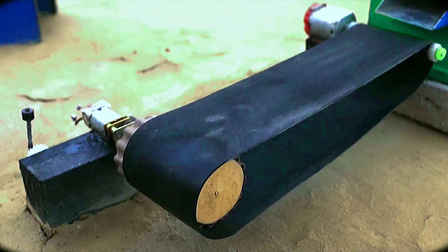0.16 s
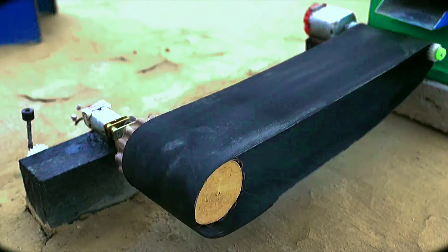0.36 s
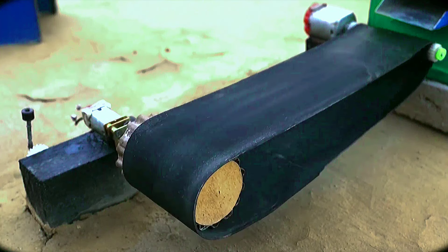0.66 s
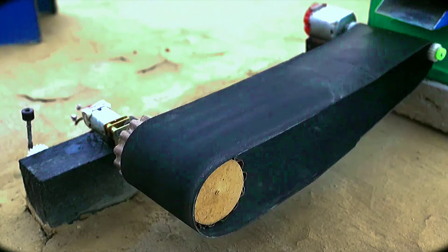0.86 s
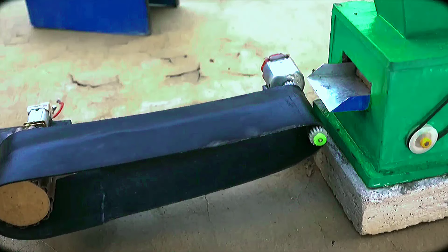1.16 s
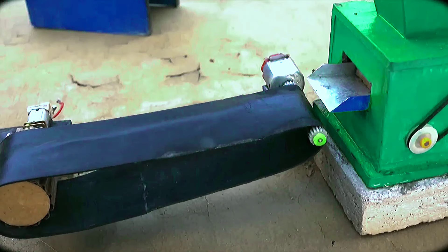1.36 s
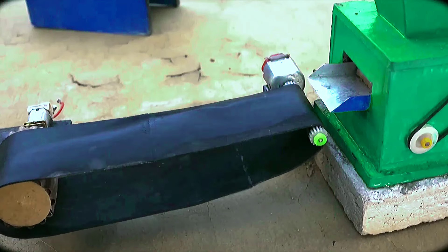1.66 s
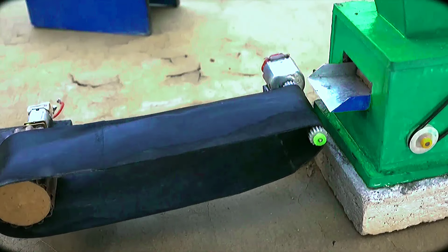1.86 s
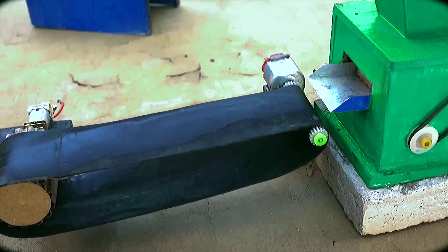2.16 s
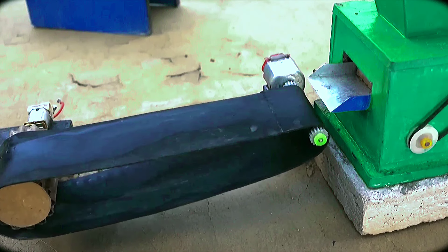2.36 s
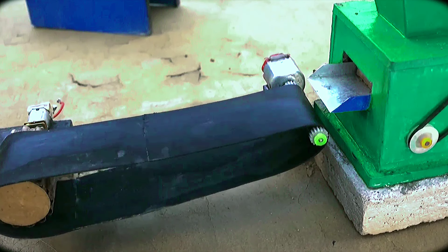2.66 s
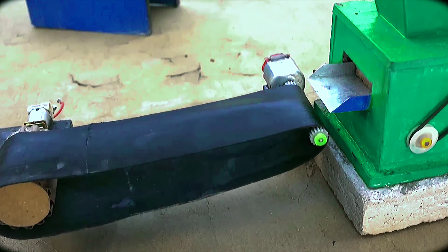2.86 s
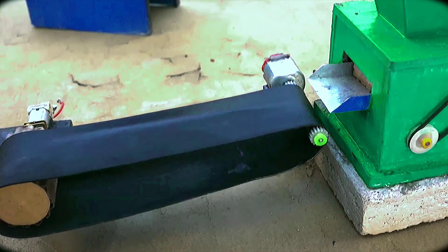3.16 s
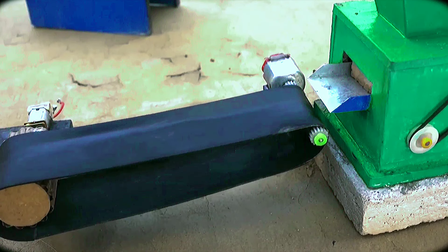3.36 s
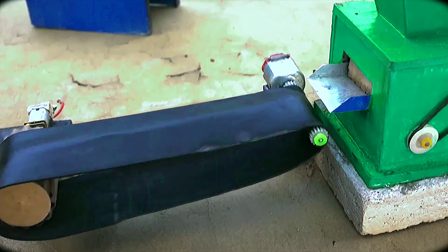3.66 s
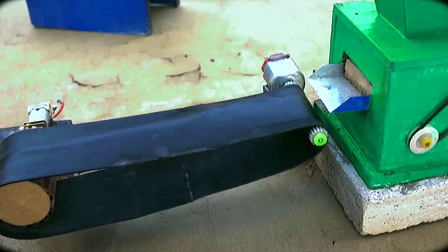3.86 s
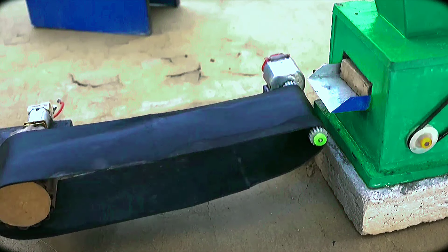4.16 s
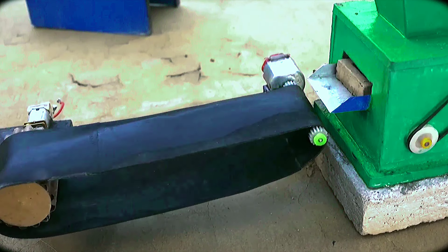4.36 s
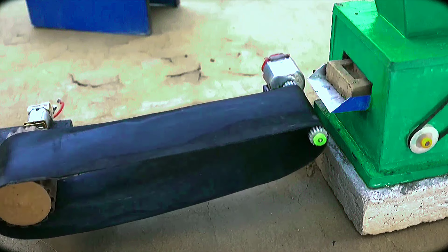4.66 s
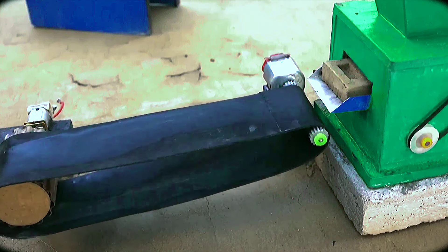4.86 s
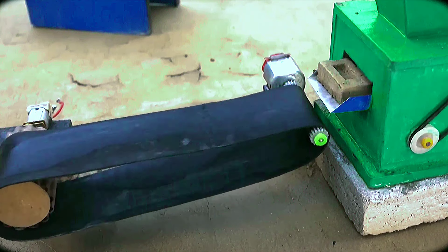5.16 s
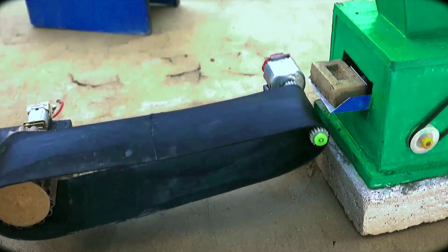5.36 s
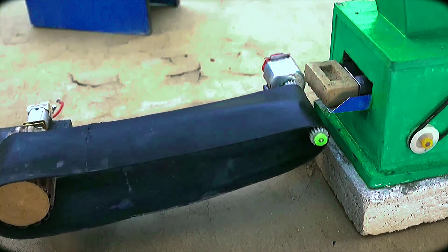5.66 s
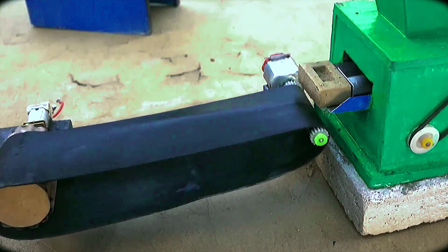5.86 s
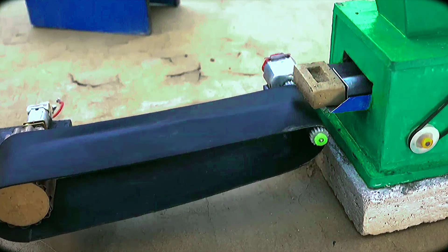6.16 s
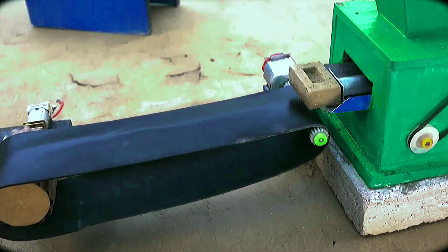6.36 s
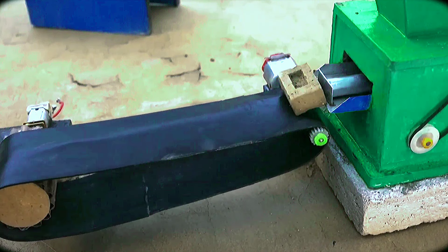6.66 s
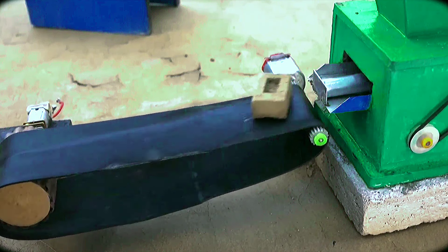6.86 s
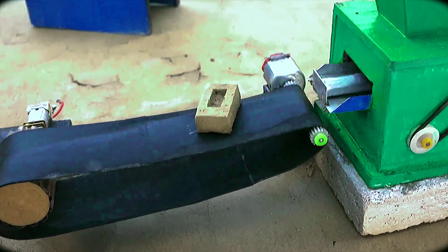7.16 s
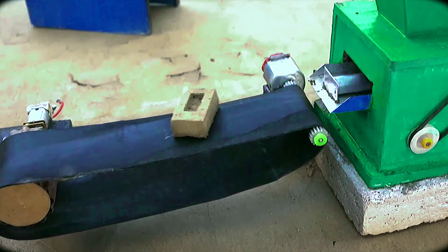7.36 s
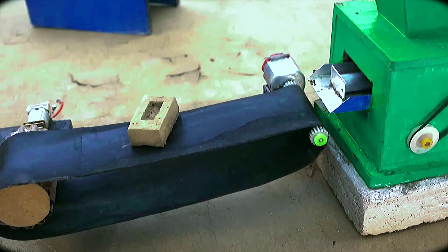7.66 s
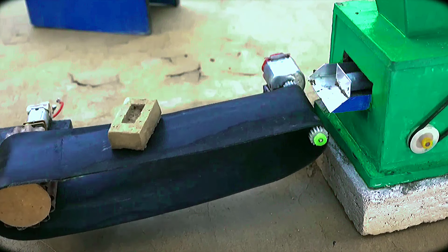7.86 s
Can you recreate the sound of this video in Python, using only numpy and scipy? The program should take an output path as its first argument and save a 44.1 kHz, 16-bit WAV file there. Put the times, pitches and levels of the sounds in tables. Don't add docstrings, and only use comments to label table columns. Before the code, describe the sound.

A miniature conveyor runs outdoors: piercing high motor whine, wavering gear tone, fine brush hiss, quick dry squeaks, and a faint distant engine drone.

```python
import sys
import numpy as np
from scipy import signal
from scipy.io import wavfile
from scipy.ndimage import uniform_filter1d

SR = 44100
rng = np.random.default_rng(int(sys.argv[2]) if len(sys.argv) > 2 else 0)


def invert_db(x):
    u = np.asarray(x, float) / 20
    return 10 ** u


def to_wav(sig):
    pcm = np.clip(np.atleast_2d(sig), -1, 1) * 32767
    pcm = np.round(pcm).astype(np.int16)
    wavfile.write(sys.argv[1], SR, pcm.T)


N = 352844

# t/s, third order f/Hz, its level/dB, first order level/dB, dip depth a gear turn [0-1]
STEADY_MESH = [(0.0, 4655, -33.5, -31, .5), (0.45, 4696, -30.5, -32.5, .6), (1.128, 4680, -33, -32, .55),
               (1.143, 4600, -36, -30.5, .6), (1.6, 4592, -31, -34.5, 0.09), (2.1, 4610, -32.5, -38, .2),
               (2.8, 4610, -32, -43, .3), (2.92, 4605, -33, -28, 0), (3.6, 4578, -30, -28, 0.21),
               (4.1, 4585, -31.5, -24.5, 0), (4.7, 4578, -30, -24, 0), (5.45, 4608, -33.5, -23.5, 0.29),
               (5.75, 4572, -33, -28, 0.41), (6.0, 4608, -31, -24.5, .75), (6.45, 4548, -31, -31.5, .75),
               (6.8, 4580, -27, -26.5, .7), (7.5, 4565, -29, -26, .95), (8.0, 4605, -30.5, -25.5, .88)]
# order number, level/dB
STEADY_ORDERS = [
    [(2, -38.5), (4, -32), (6, -40.5), (8, -56), (9, -54)],
    [(2, -37), (4, -41), (6, -41), (7, -51), (8, -55), (9, -49)],
]
GEAR_LEAD = [.17, 0.14]
# t/s, lead [turns], length [s]
GEAR_SLIP = [
    (6.65, .17, .3),
]
# t/s, level/dB, length [s]
THIRD_DIPS = [
    (1.39, -4, 0.039),
    (2.9, -3, 0.093),
    (5.6, -1, .03),
    (5.9, -13, .045),
    (6.112, -20, 0.029),
    (7.965, -14, 0.037),
]
# t/s, level/dB, length [s]
FIRST_DIPS = [(2.12, -8, 0.029), (2.37, -5, .03), (2.67, -9, 0.037), (3.611, -8, .04), (4.39, -9, .012),
              (4.57, -7, .012), (4.72, -8, .012), (5.2, -8, .015), (5.73, -7, .03), (7.04, -8, .025),
              (7.4, -8, .025)]
FIFTH_DB = [-40.5, -40.5]
# t/s, level/dB, length [s]
FIFTH_SWELLS = [
    (3.3, -5, .35),
    (3.85, 3, .15),
    (5.4, 5, .3),
    (6.1, -6, .3),
    (6.68, 5.5, .1),
    (7.8, -5, .4),
]


def steady_motor():
    third_hz, third_db, first_db, depth = curves(STEADY_MESH)
    mesh_beats_a_turn, swing_hz, swing_lead = 281.5, 14, 0.322
    turns = np.cumsum(third_hz / 3) / SR / mesh_beats_a_turn
    gear = 2 * np.pi * (turns + by_position(GEAR_LEAD) + bumps(GEAR_SLIP))
    third_hz = third_hz + swing_hz * np.cos(gear + 2 * np.pi * swing_lead) + 9 * wander(5.09)
    third_db = third_db + bumps(THIRD_DIPS) + 1.08 * wander(7.3)
    first_db = first_db + bumps(FIRST_DIPS)
    depth = np.clip(depth, 0, .97)
    first = invert_db(first_db + 3.0) * abs(1 + depth * np.exp(1j * gear)) ** .85
    phase = 2 * np.pi * np.cumsum(third_hz / 3 + 3.82 * wander(46.7)) / SR
    out = invert_db(third_db + 1.16 * wander(22) + 7.0) * np.cos(3 * phase)
    slip = (.2 + .012 / (first + .004)) * wander(30)
    flutter_db = (.8 + .012 / (first + .006)) * wander(30)
    out += first * invert_db(flutter_db) * np.cos(phase + slip)
    fifth_db = by_position(FIFTH_DB) - 3.5 * depth * np.cos(gear + .1) + bumps(FIFTH_SWELLS)
    out += invert_db(fifth_db + 4.0 + 2.3 * wander(32)) * np.cos(5 * phase)
    for orders, heard in zip(STEADY_ORDERS, (~second_position(), second_position())):
        for order, db in orders:
            level = invert_db(db + 2.0 * wander(5.6) + 1.6 * wander(50))
            out += heard * level * np.cos(order * phase + .3 * wander(40))
    return out


# t/s, f/Hz, tooth pressure level/dB
LOADED_MESH = [(0.0, 1772, 0), (.27, 1766, 0), (.5, 1886, 0.5), (1.128, 1916, 0), (1.143, 1835, -0.5),
               (1.75, 1838, -4), (1.85, 1868, -1), (2.8, 1878, 2), (3.1, 1857, 1), (4.1, 1845, 0.5),
               (4.4, 1920, 1), (4.56, 1862, -0.5), (5.16, 1842, -1), (5.27, 1918, 0), (6.29, 1900, 0.5),
               (6.37, 1848, -2), (7.6, 1874, 0), (8.0, 1871, 0)]
# t/s, shift f/Hz, length [s]
SNAGS = [(1.15, -30, 0.031), (1.41, -42, 0.099), (2.09, -14, 0.067), (2.75, 14, 0.041),
         (3.014, -69.5, 0.049), (3.258, -52.5, .06), (3.6, -20, 0.051), (4.775, 35.5, .04),
         (5.0, -30, 0.098), (5.56, -22, .06), (5.99, -35.5, .14), (6.28, 14, 0.038), (6.59, -88, .13),
         (6.78, 10, .04), (6.92, -48, 0.071)]
# f/Hz, level/dB
MOUNT = [
    [(1765, -20.5), (1820, -25.5), (1890, -21.5), (1915, -21.5)],
    [(1775, -20), (1800, -25.5), (1825, -27.5), (1850, -24), (1878, -19.5), (1915, -18)],
]
WHEEL_LEAD = [-.17, -.04]
WHEEL_DEPTH = [.4, .27]
# f/Hz, level/dB
CASING = [(3500, -44.5), (3650, -39.5), (3850, -46.5), (5300, -56), (5600, -37.5), (5750, -31.5),
          (7400, -54), (9300, -48), (9700, -52), (10600, -44), (11100, -40.5), (11400, -52), (13000, -55)]
# f/Hz, width [Hz], level/dB
RATTLE_MODES = [
    [(936, 13, -52), (2640, 46, -54), (3200, 370, -40.5), (5540, 710, -33.5), (7060, 500, -43)],
    [(982, 78, -56), (2542, 58, -46), (3420, 150, -41), (5550, 170, -37), (6980, 1030, -40.5)],
]
# t/s, level/dB
LOOSENESS = [(1.15, -35), (2.66, -32.5), (2.94, -38), (4.03, -33), (4.31, -37), (6.28, -39), (6.36, -39),
             (6.51, -36.5), (8.0, -39.5)]


def loaded_motor():
    hz, pressure_db = curves(LOADED_MESH)
    hz = hz + bumps(SNAGS)
    level_db = pressure_db + by_position([np.interp(hz, *np.transpose(mount)) for mount in MOUNT])
    depth = by_position(WHEEL_DEPTH) * invert_db(2.2 * wander(2.1))
    mesh_beats_a_turn = 134.14
    wheel = 2 * np.pi * (np.cumsum(hz) / SR / mesh_beats_a_turn + by_position(WHEEL_LEAD))
    slack = np.clip((-19.0 - level_db) / 7, .1, 1)
    throb = 1 + 1.1 * depth * np.cos(wheel) + (.18 + .1 * slack) * np.cos(2 * wheel - .55)
    phase = 2 * np.pi * np.cumsum(hz - 2.9 * np.sin(wheel) + 5.44 * wander(30.5)) / SR
    chatter_hz = (9.7 + 14 * slack) * np.sin(2 * wheel + 2.02) + 10 * slack * wander(36.3)
    chatter = 2 * np.pi * np.cumsum(chatter_hz) / SR
    out = invert_db(level_db + 2.5 + (0.25 + 2.0 * slack) * wander(57)) * np.cos(phase + chatter)
    ragged_skirt = evened(resonate(rng.standard_normal(N), hz, 120))
    out += invert_db(level_db - 4.5) * slack * ragged_skirt
    out *= np.sqrt(abs(throb))
    for order in range(2, 8):
        radiated_db = np.interp(order * hz, *np.transpose(CASING))
        blur = .17 * order * wander(70)
        out += invert_db(radiated_db + 3.5 * wander(23)) * np.cos(order * phase + blur)
    knocks = rng.standard_normal(N) * invert_db(1.0 * wander(106))
    second_order_db = np.interp(2 * hz, *np.transpose(CASING)) + 3
    out += invert_db(second_order_db) * evened(resonate(knocks, 2 * hz - 50, 170))
    loose = invert_db(curves(LOOSENESS)[0] + 36.5)
    for modes, heard in zip(RATTLE_MODES, (~second_position(), second_position() * loose)):
        for mode_hz, width, db in modes:
            out += heard * invert_db(db) * evened(resonate(knocks, mode_hz, width))
    return np.sqrt(abs(throb)) * out


# t/s, turns done, level/dB
ROLLER_RUBS = [(0.141, 0, -26.5), (.568, 2, -32.5), (.981, 4, -26.5), (1.288, 5, -31.5), (1.838, 8, -32),
               (2.628, 12, -29.5), (3.506, 17, -32), (3.874, 19, -28.5), (4.531, 23, -32.5),
               (5.353, 28, -32.5), (6.087, 32, -36), (6.245, 33, -32), (6.9, 37, -34.5), (7.232, 39, -35),
               (7.404, 39.5, -46), (7.573, 41.5, -37), (7.912, 42.5, -42)]
# t/s of the top, level/dB, top f/Hz
SQUEAKS = [(1.292, -31, 7600.0), (1.464, -42, 7300.0), (1.656, -34, 6710), (1.841, -31, 7400),
           (2.44, -36, 8000), (2.625, -33, 7900.0), (2.815, -37, 8000), (2.991, -34, 7800),
           (3.173, -31.8, 8800.0), (3.346, -31.5, 8670), (3.515, -33, 7300.0), (3.701, -39.1, 6850.0),
           (3.871, -32, 8700), (4.046, -38.1, 7300.0), (4.207, -25, 6710), (4.385, -36, 6530),
           (5.041, -35.5, 7244), (5.197, -37.9, 7154), (5.366, -36.6, 7640), (5.718, -36, 8650.0),
           (5.903, -37.7, 7500), (6.087, -33, 9050), (6.241, -32, 8400), (6.407, -23.5, 6380),
           (6.579, -27, 7160), (6.74, -31, 7200), (6.915, -37.4, 6960), (7.072, -37, 6600),
           (7.235, -27, 6400.0)]
# f/Hz, level/dB
RUB_TONE = [
    [(4000, -20), (6000, -15), (8500, 3), (10500, 4), (11800, 3), (12500, -8), (15500, -4.5)],
    [(4000, -34), (6000, -2), (9500, 6.5), (10400, 3), (12100, 1.5), (12900, 9), (13700, 1), (15500, -1)],
]
SHAFT_HZ = 86.1


def roller():
    press, squeaks = np.zeros(N), np.zeros(N)
    half = SR // 12
    u = np.arange(-half, half) / SR
    at, done, rub_db = np.transpose(ROLLER_RUBS)
    turn = np.arange(44)
    times = np.interp(turn, done, at)
    levels = np.interp(turn, done, rub_db) + 1.1 * rng.standard_normal(len(turn))
    for s, db in zip(times, levels):
        length = .055 if s < SHOTS[0][1] else .036
        add(press, s - half / SR, invert_db(db + 1.1) * np.exp(-abs(u / length) ** 4.2))
    for s, db, top_hz in SQUEAKS:
        for turns, lower_hz, less_db in ((0, 0, 0), (-1, 700, -4), (1, 1000, -6)):
            hz = top_hz - lower_hz - 130e3 * abs(u - turns / SHAFT_HZ)
            fade = np.clip((hz - 5600) / 900, 0, 1)
            slip = evened(resonate(rng.standard_normal(len(u)), hz, 300))
            add(squeaks, s - half / SR, invert_db(db + less_db) * fade * slip)
    grains = coloured(RUB_TONE, patchy_db=2.6) * invert_db(1.2 * wander(300)) * shaft_beat(.45)
    return press * grains + squeaks


# f/Hz, level/dB
HISS_TONE = [
    [(24, -74), (40, -45), (247, -11), (1280, -20.5), (1570, -10.5), (1690, -15), (1920, -7), (2460, -18),
     (4260, -15), (4700, -7.5), (5070, -14), (5600, -9), (8350, -18.5), (11300, -19), (15600, -24)],
    [(30, -48), (75, -36), (140, -18.5), (390, -9.5), (620, -18), (1300, -21), (1700, -15), (2050, -13),
     (2780, -17.5), (3300, -12.5), (4120, -15.5), (4600, -11), (6200, -17), (10000, -21.5), (15600, -27)],
]
HISS_DB = [-36, -37]


def hiss():
    level = np.where(second_position(), invert_db(HISS_DB[1] + 9), invert_db(HISS_DB[0] + 10))
    return level * coloured(HISS_TONE, patchy_db=2.2) * shaft_beat(.18)


def shaft_beat(depth):
    turn = 2 * np.pi * np.cumsum(SHAFT_HZ + 1.41 * wander(2.7)) / SR
    return 1 + depth * np.cos(turn) + 0.31 * depth * np.cos(2 * turn)


# start t/s, end t/s, f/Hz, width [Hz], level/dB
SCRAPES = [
    (1.907, 2.073, 1340, 760, -32.5),
    (1.9, 2.08, 2370, 490, -32.5),
    (4.961, 5.06, 1030, 88.3, -42),
    (5.091, 5.255, 960, 170, -39.5),
    (5.32, 5.42, 894, 197, -44),
]


def scrapes():
    out = np.zeros(N)
    for start, end, hz, width, db in SCRAPES:
        grit = rng.standard_normal(SR // 4)[:round((end - start) * SR)]
        window = signal.windows.tukey(len(grit), .4)
        add(out, start, invert_db(db) * window * evened(resonate(grit, hz, width)))
    return out


# t/s, hum level/dB, hum f/Hz, rumble level/dB
DRONE = [(0.0, -46, 390, -50), (1.125, -50, 356, -48), (1.15, -33.5, 384.5, -42), (1.98, -31.5, 399, -40),
         (2.03, -37.5, 392, -45), (2.56, -27.5, 357.7, -38), (3.21, -26.5, 373, -44),
         (3.54, -29.5, 363, -44), (3.79, -28, 353.3, -58), (3.9, -26.5, 365.5, -39),
         (4.41, -43, 410.9, -51.5), (6.82, -37.5, 378, -53.5), (7.98, -49, 370, -47), (8.0, -50, 360, -64)]


def drone():
    hum_db, hum_hz, rumble_db = curves(DRONE)
    hum = evened(resonate(rng.standard_normal(N), hum_hz, 76))
    rumble = evened(resonate(resonate(rng.standard_normal(N), 221, 163), 224, 180))
    return invert_db(hum_db - 3.5) * hum + invert_db(rumble_db - 0.5) * rumble


def coloured(spectra, patchy_db):
    frames, hz = N // 128 + 5, np.fft.rfftfreq(512, 1 / SR)
    a, b, patches = rng.standard_normal((frames, len(hz), 3)).T
    a, b, patches = a.T, b.T, patches.T
    patches = uniform_filter1d(patches.T, size=5, axis=0)
    patches = evened(uniform_filter1d(patches, size=16, axis=1))
    shapes = []
    for spectrum in spectra:
        f, db = np.transpose(spectrum)
        shapes.append(evened(invert_db(np.interp(np.log(hz + 1), np.log(f), db))))
    first, second = shapes
    moved = np.arange(frames) * 128 / SR > SHOTS[0][1] + .007
    z = (a + 1j * b).T * invert_db(patchy_db * patches) * np.where(moved, second[:, None], first[:, None])
    return evened(signal.istft(z, nperseg=512, noverlap=384)[1][:N])


def resonate(x, hz, width):
    r = np.exp(-np.pi * width / SR)
    if np.isscalar(hz):
        pole = r * np.exp(2j * np.pi * hz / SR)
        return 2 * signal.lfilter([(1 - r) ** 2], [1, -2 * pole, pole * pole], x).real
    turn = np.exp(2j * np.pi * np.cumsum(hz) / SR)
    smooth = signal.lfilter([(1 - r) ** 2], [1, -2 * r, r * r], x / turn + 1e-18)
    return 2 * (turn * smooth).real


def wander(hz):
    steps = N // 16 + 2
    r = np.exp(-2 * np.pi * hz * 16 / SR)
    slow = signal.lfilter([1], [1, -2 * r, r * r], rng.standard_normal(steps))
    return np.interp(np.arange(N) / 16, np.arange(steps), evened(slow))


def evened(x):
    return x / np.sqrt(np.mean(x ** 2) + 1e-20)


def curves(table):
    s, *columns = np.transpose(table)
    return [np.interp(np.arange(N) / SR, s, column) for column in columns]


def bumps(rows):
    t = np.arange(N) / SR
    return sum(size * np.exp(-((t - s) / length) ** 2) for s, size, length in rows)


# from t/s, to t/s
SHOTS = [
    (0, 1.128),
    (1.143, 8.0),
]


def second_position():
    return np.arange(N) / SR > SHOTS[0][1]


def by_position(pair):
    return np.where(second_position(), pair[1], pair[0])


def add(mix, s, sound):
    part = mix[round(s * SR):][:len(sound)]
    part += sound[:len(part)]


def scene():
    mono = steady_motor() + loaded_motor() + roller() + hiss() + scrapes() + drone()
    return np.array([mono, mono])


def top_cut(x):
    return signal.sosfilt(signal.butter(12, 15740, fs=SR, output="sos"), x)


# from t/s, to t/s
GAPS = [
    (1.1288, 1.1422),
    (4.4541, 4.4656),
]


def record(dry):
    t, kept = np.arange(N) / SR, np.ones(N)
    for start, end in GAPS:
        kept *= np.clip(np.maximum(start - t, t - end) * 3000, invert_db(-33.5), 1)
    thin = signal.sosfilt(signal.butter(1, 120, "high", fs=SR, output="sos"), dry)
    soft = thin / (1 + (thin / 0.63) ** 4) ** (1 / 4)
    band_limit = signal.firwin(1023, 15510, window=("kaiser", 7), fs=SR)
    limited = signal.oaconvolve(soft, band_limit[None], "same")
    return top_cut(limited * kept - .0012)


dry = scene()
out = record(dry)
to_wav(out)
```